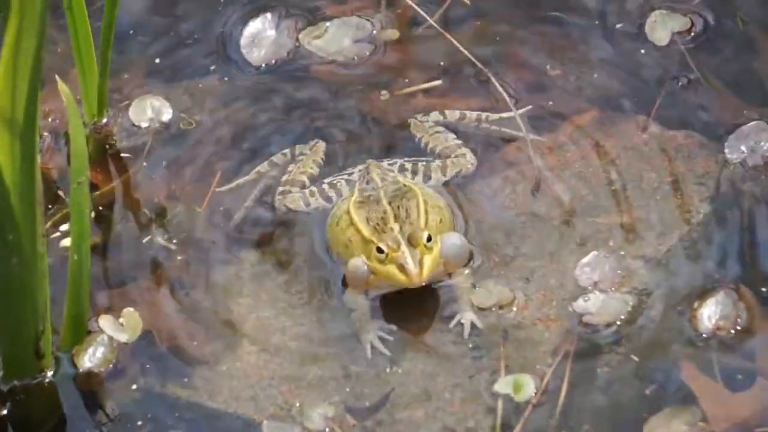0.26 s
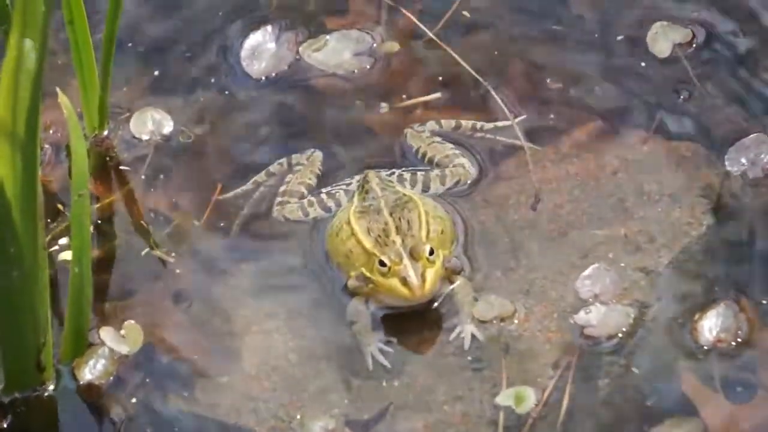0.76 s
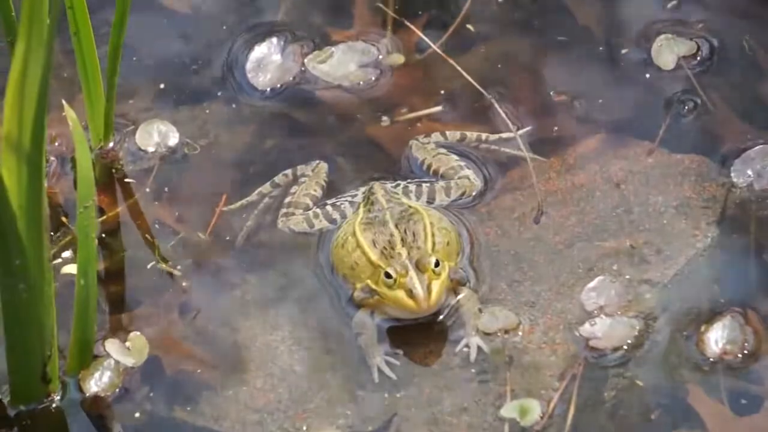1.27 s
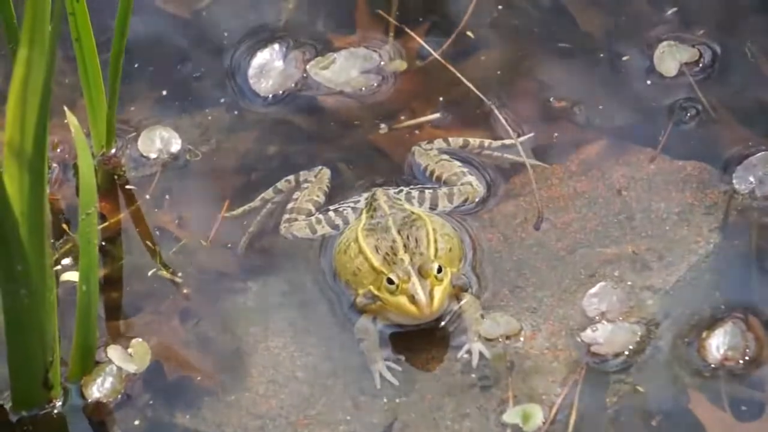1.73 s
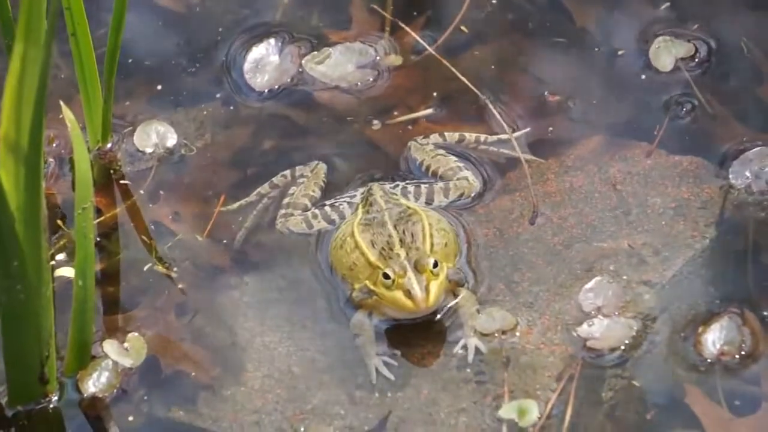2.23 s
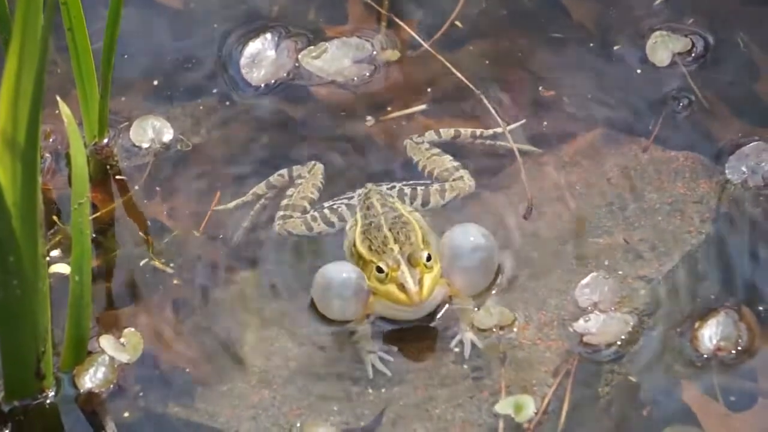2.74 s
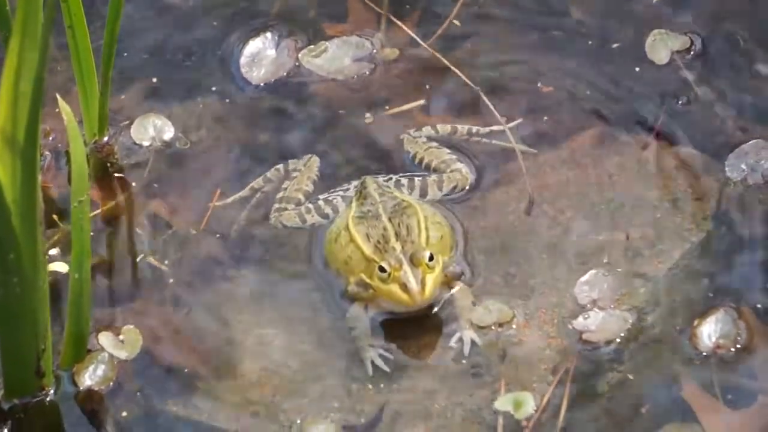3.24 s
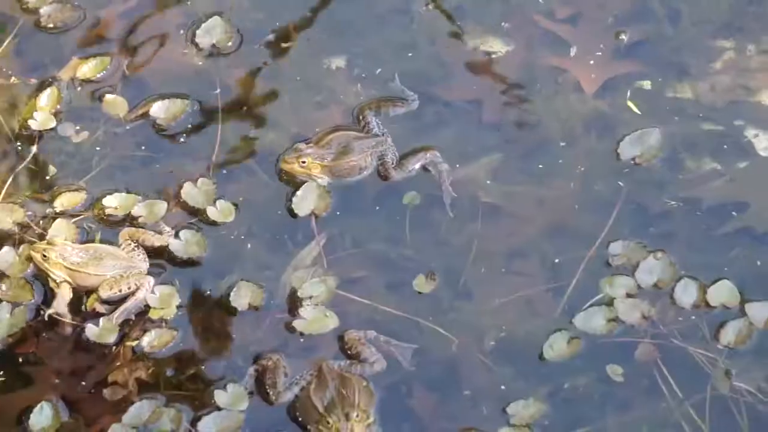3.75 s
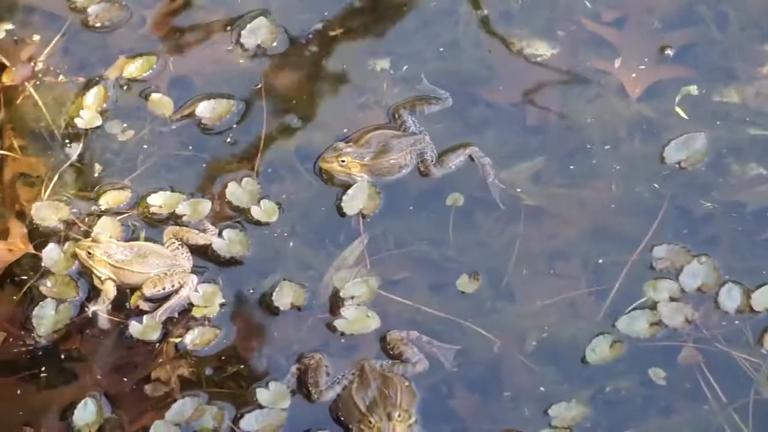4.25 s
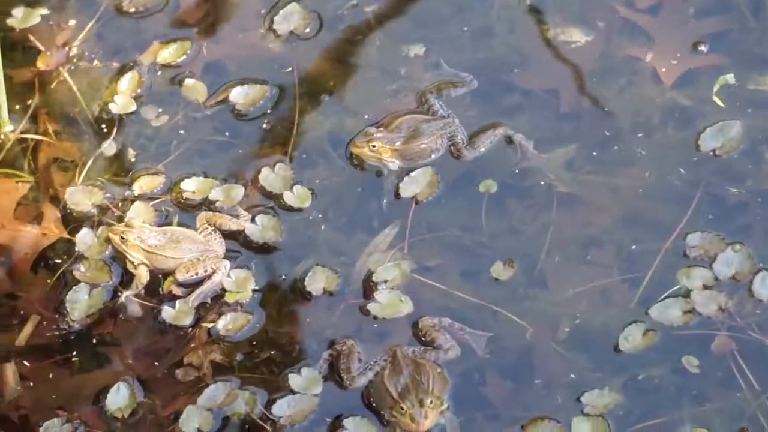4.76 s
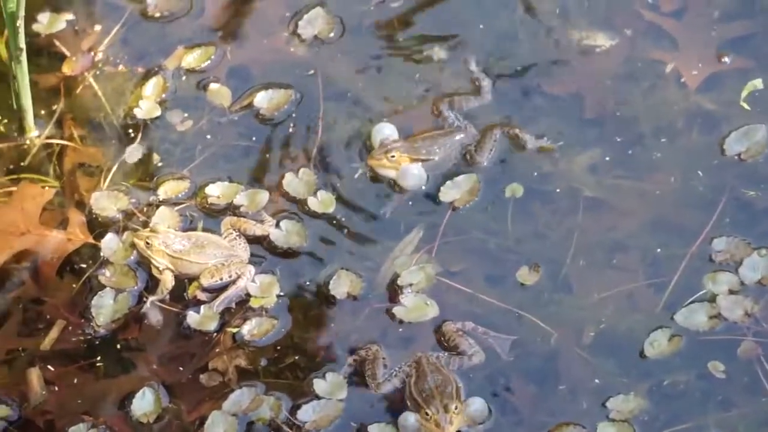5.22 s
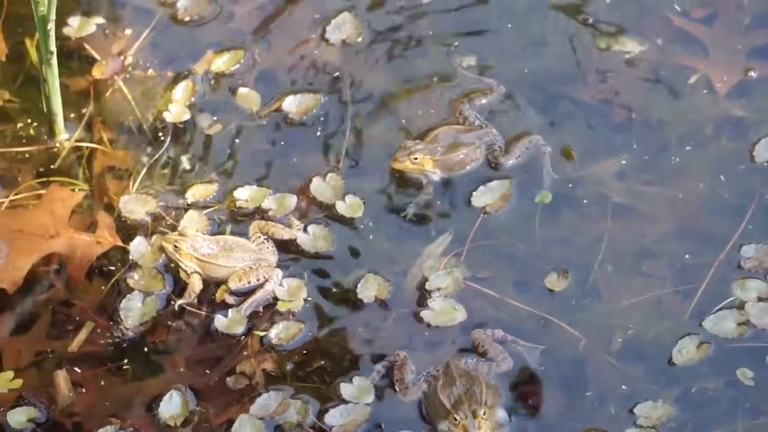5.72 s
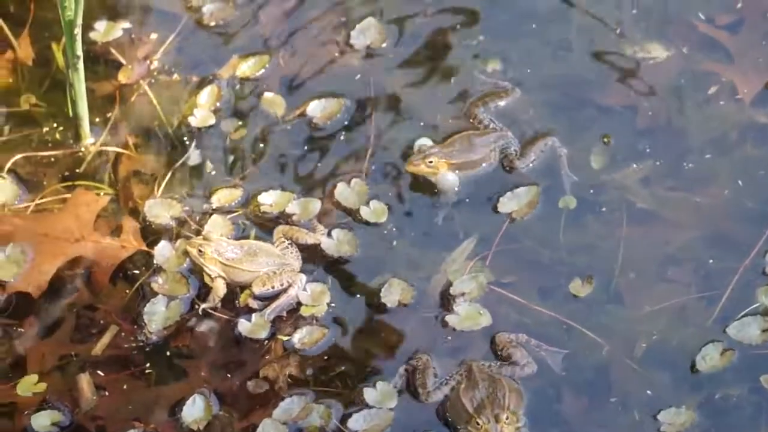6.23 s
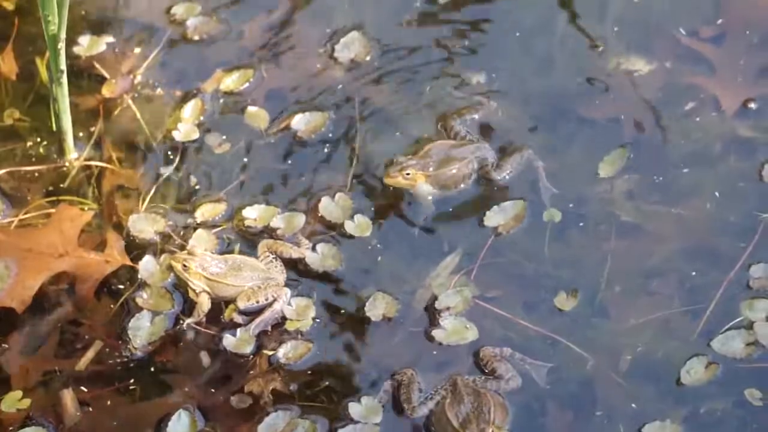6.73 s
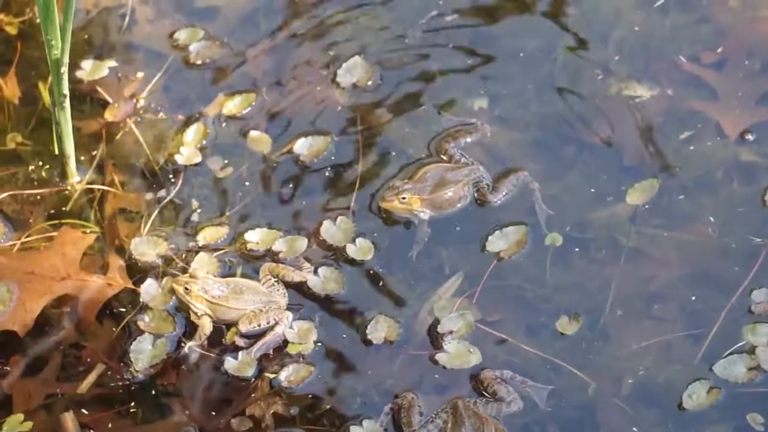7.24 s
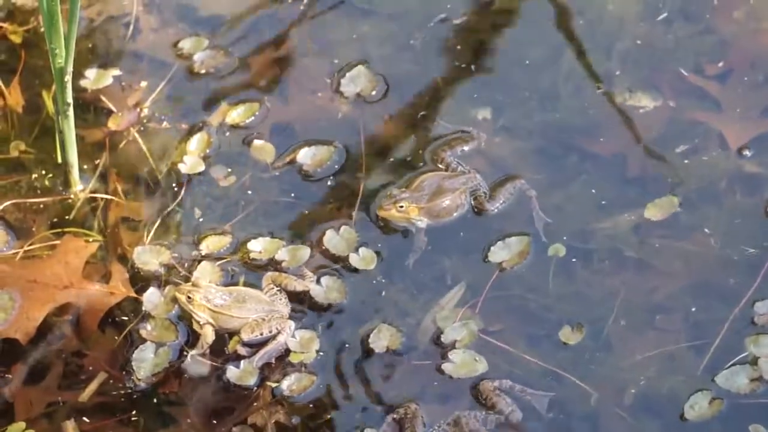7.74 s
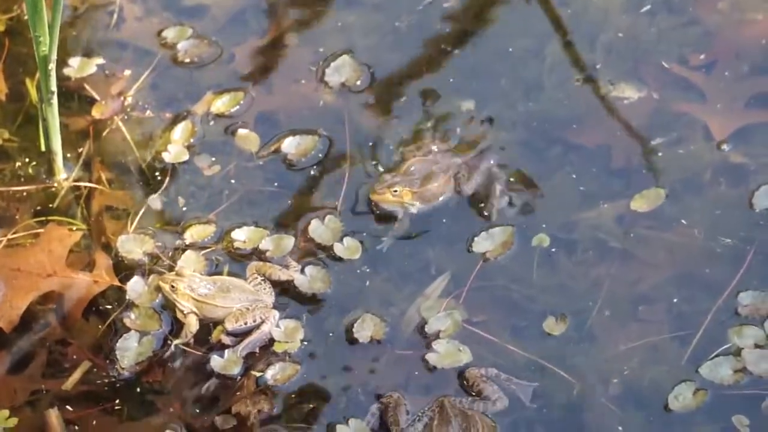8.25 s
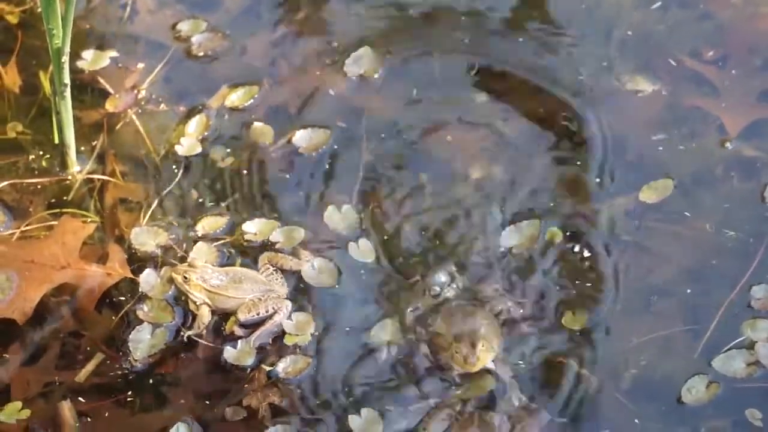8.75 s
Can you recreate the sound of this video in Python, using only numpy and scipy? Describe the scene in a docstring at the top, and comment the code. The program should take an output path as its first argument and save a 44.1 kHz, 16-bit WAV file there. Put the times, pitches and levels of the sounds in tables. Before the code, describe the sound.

A dense, rattling chorus of many frogs croaks almost nonstop at a pond, breaking off briefly once with a click before resuming.

```python
"""A pond bank: a frog chorus close to a small stereo microphone.
Each croak note is a slowing run of throat clicks that ring sac and body; near frogs stand out,
many farther ones fill the gaps. Rumble, light wind and thin hiss are shaped noise, a bird's whistles
gliding sines, a far engine five overtones. The sound breaks off once, with a click, and fades back in
from another spot on the bank; a faint tick follows. Click and tick are noise bursts."""
import sys
import numpy as np
from scipy import signal
from scipy.fft import rfft, irfft, next_fast_len
from scipy.io import wavfile
from scipy.ndimage import uniform_filter1d, minimum_filter1d, map_coordinates

SR = 44100
rng = np.random.default_rng(int(sys.argv[2]) if len(sys.argv) > 2 else 0)


def gain_from_decibels(decibels):
    """Convert decibel values to linear amplitude factors."""
    exponent = np.asarray(decibels, float) / 20
    return 10 ** exponent


def transcribe(signal):
    """Save signal, clipped to [-1, 1], as a 16-bit WAV file at the path in sys.argv[1]."""
    frames = np.atleast_2d(signal).T
    limited = np.clip(frames, -1, 1)
    pcm = np.round(limited * 32767).astype(np.int16)
    wavfile.write(sys.argv[1], SR, pcm)


N = 396018

# the drop and the fade back; row 1 starts the second spot: t/s, gain/dB
BREAK_GAIN = [(3.738, 0), (3.7392, -21), (3.748, -23), (3.753, -36), (3.765, -20), (3.79, -3), (3.85, 0)]


def unit(x):
    """x at rms 1."""
    return x / np.sqrt(np.mean(x ** 2) + 1e-20)


def along(points, hz):
    """(Hz, value) points interpolated on a log frequency axis."""
    f, v = np.transpose(points)
    return np.interp(np.log(hz + 1), np.log(f + 1), v)


def curves(rows):
    """One value per sample for each column after the time."""
    s, *cols = np.transpose(rows)
    return [np.interp(np.arange(N) / SR, s, c) for c in cols]


def wobble(rate_hz):
    """Smooth random curve, rate_hz knots a second."""
    knots = rng.standard_normal(int(N * rate_hz / SR) + 4)
    return map_coordinates(knots, [np.arange(N) * rate_hz / SR])


def noise(spectrum, alike):
    """Coloured stereo noise of rms 1; alike is the left-right correlation."""
    m = next_fast_len(N)
    gain = gain_from_decibels(along(spectrum, np.fft.rfftfreq(m, 1 / SR)))
    a, b = irfft(rfft(rng.standard_normal((2, m))) * gain, m)[:, :N]
    u = np.arccos(np.clip(alike, -1, 1)) / 2
    left = np.cos(u) * a + np.sin(u) * b
    right = np.cos(u) * a - np.sin(u) * b
    return unit(np.array([left, right]))


def rumble():
    """Distant rumble: low noise almost alike in both ports."""
    # rumble spectrum: f/Hz, relative density/dB
    rumble_shape = [(15, -50.5), (60, -22.5), (108, -8.5), (173, -3), (246, -1.5), (300, -0.5),
                    (390, -35.5), (660, -120)]
    return noise(rumble_shape, alike=.98)


def wind():
    """Light wind buffeting the ports: low noise with a lumpy level."""
    # buffeting spectrum: f/Hz, relative density/dB
    buffet_shape = [(12, -27), (22, -2), (70, 6), (130, -9.5), (300, -120)]
    against_rumble_db = -14.5
    return noise(buffet_shape, alike=.75) * gain_from_decibels(against_rumble_db + 4 * wobble(9))


def hiss():
    """Thin high noise whose level flickers."""
    # hiss spectrum: f/Hz, relative density/dB
    hiss_shape = [(4500, -30), (5600, 3), (7000, 0), (10500, -1), (12000, -6), (12800, -9), (14500, -9),
                  (15100, -14), (15700, -18), (16000, -60)]
    return noise(hiss_shape, alike=.5) * gain_from_decibels(1.5 * wobble(16))


def whine():
    """Faint narrow high noise band, present at the first spot only."""
    # whine spectrum: f/Hz, relative density/dB
    whine_shape = [(11800, -60), (12250, 0), (12500, 0), (12900, -60)]
    against_hiss_db = -14
    first_spot = np.arange(N) / SR < BREAK_GAIN[1][0]
    return gain_from_decibels(against_hiss_db) * noise(whine_shape, alike=.8) * first_spot


def drone():
    """Far engine: only its middle overtones, 5 to 9, rise over the rumble."""
    # engine: t/s, firing rate f/Hz, level of each overtone/dB
    engine = [(3.8, 24, -80), (5.2, 26.4, -66.5), (6, 27.6, -61), (6.6, 25.7, -65.5), (7.3, 27.5, -63),
              (8.2, 31.6, -63), (8.98, 33, -67)]
    rate_hz, db = curves(engine)
    turn = 2 * np.pi * np.cumsum(rate_hz) / SR
    return gain_from_decibels(db) * sum(np.sin(k * turn + 2 * np.pi * rng.random()) for k in range(5, 10))


def air():
    """Rumble and wind follow one level curve, hiss and whine another; the drone adds."""
    # background levels: t/s, rumble level/dB, hiss level/dB
    air_levels = [(0.0, -58.5, -72), (1.28, -58.5, -66), (1.67, -61.5, -75), (2.37, -57.5, -67),
                  (2.87, -63, -74), (3.5, -55.5, -63.5), (3.83, -63, -77), (4.32, -56, -71),
                  (5.63, -65, -81), (6.0, -60, -75), (6.85, -62, -76.5), (7.2, -55, -67),
                  (7.6, -66.5, -79.5), (8.98, -58, -71)]
    rumble_db, hiss_db = curves(air_levels)
    return gain_from_decibels(rumble_db) * (rumble() + wind()) + gain_from_decibels(hiss_db) * (hiss() + whine()) + drone()


def clicks():
    """The click of the cut, then a faint tick: bursts of differenced noise with an 8 ms t60."""
    # row 0 the click of the cut, row 1 the faint tick: t/s, level/dB
    bursts = [(3.737, -43.5), (4.7008, -48)]
    out, t = np.zeros((2, N)), np.arange(400) / SR
    pan = gain_from_decibels(np.array([[-2.5], [2.5]]))
    for s, db in bursts:
        burst = np.diff(rng.standard_normal(len(t) + 1))
        out[:, round(s * SR):][:, :len(t)] += gain_from_decibels(db - 60 * t / .008) * burst * pan
    return out


def bird():
    """Thin whistles with soft ends; pitch glides on a parabola through three values."""
    # whistles: start t/s, end t/s, first f/Hz, middle f/Hz, last f/Hz, level/dB
    whistles = [(5.57, 5.81, 2350, 1985, 1880, -34.5), (7.495, 7.585, 1960, 2070, 2230, -32.5),
                (8.345, 8.435, 1800, 1850, 1990, -31), (8.75, 8.805, 1850, 1870, 1930, -36)]
    t, out = np.arange(N) / SR, np.zeros(N)
    for start, end, first_hz, middle_hz, last_hz, db in whistles:
        u = np.clip((t - start) / (end - start), 0, 1)
        hz = first_hz * (1 - u) * (1 - 2 * u) + middle_hz * 4 * u * (1 - u) + last_hz * u * (2 * u - 1)
        swell = np.sin(np.pi * u) ** .43
        out += swell * gain_from_decibels(db) * np.sqrt(2) * np.sin(2 * np.pi * np.cumsum(hz) / SR)
    return out * gain_from_decibels(np.array([[.8], [-.8]]))


def bank(x):
    """Diffuse echo off water and plants: decaying noise, different in each port."""
    # echo decay: f/Hz, t60/s
    bank_t60 = [(300, 0.67), (1500, 1), (5000, 0.05)]
    hz, t, z = signal.stft(rng.standard_normal((2, SR // 4)), SR, nperseg=256)
    decay = gain_from_decibels(-60 * t / along(bank_t60, hz)[:, None])
    tail = signal.istft(z * decay, SR, nperseg=256)[1]
    return signal.fftconvolve(x, tail / np.linalg.norm(tail[0]), axes=1)[:, :N]


def croaks(notes, first_s, slowing, jitter, scatter_db, blur, upper_t60, count=12):
    """Stereo sum of notes: every click rings the sac, its lower partner, the upper ring and the body."""
    # rings of throat and body: f/Hz, level/dB, t60/s
    body_rings = [(393, -22, 0.02), (552, -19.5, 0.028), (700, -22.5, 0.054), (955, -15.5, 0.026),
                  (1879, -10, 0.0063), (2576, -28, 0.043), (3090, -25, 0.0069), (3600, -30, 0.0072),
                  (4900, -40.5, 0.019)]
    sac_level_db, upper_gain_db, phase_scatter_rad = -3.5, 5, .65
    s, db, sac_hz, top_hz, top_db, pan_db, length = np.transpose(notes)[:, :, None]
    draw = rng.standard_normal((len(notes), count, 39))

    # the clicks slow down
    gaps = first_s * np.exp(slowing * np.arange(count) + jitter * draw[..., 0])
    since = np.cumsum(gaps, axis=1) - gaps[:, :1]
    # firm start, level middle, fading end
    swell_db = 1.5 * np.exp(-since / .008) - 9 * (since / np.clip(length, .012, .08)) ** 2.3
    size_db = db + swell_db + scatter_db * draw[..., 1]

    modes = [(sac_hz, sac_level_db, .024, .008), (.86 * sac_hz, sac_level_db - 10, .013, .05)]
    # the upper ring builds up, then sinks and fades as the sac empties
    upper_hz = top_hz * (1.035 - 1.4 * since)
    upper_db = top_db + upper_gain_db - 3 * np.exp(-since / .004) - 90 * since
    modes.append((upper_hz, upper_db, upper_t60, blur))
    build = np.exp(.08 * draw[:, :1, 2])  # body size, drawn per note
    # a strong upper ring goes with a wider spectrum at both ends
    open_db = .26 * np.clip(top_db + 29, -10, 10)
    for hz, level_db, t60 in body_rings:
        tilt_db = -.0037 * hz * (since - .02)  # first clicks are the brightest
        spread_db = open_db * abs(np.log(hz / 1000))
        modes.append((hz * build, level_db + tilt_db + spread_db, t60, .04))

    t = np.arange(520, dtype=np.float32) / SR
    ring = 0
    for k, (hz, level_db, t60, spread) in enumerate(modes):
        hz = (hz * np.exp(spread * draw[..., 3 + k])).astype(np.float32)[..., None]
        size = gain_from_decibels(size_db + level_db + 1.1 * draw[..., 15 + k]).astype(np.float32)[..., None]
        phase = (np.pi * k + phase_scatter_rad * draw[..., 27 + k, None]).astype(np.float32)
        decay = gain_from_decibels(-60 * t / t60).astype(np.float32)
        ring = ring + size * np.sin(np.float32(2 * np.pi) * hz * t + phase) * decay
    ring *= (1 - np.exp(-t / .0003)) ** 2  # soft tissue takes a cycle to start

    out = []
    for side in (1, -1):
        # the nearer port hears it first
        start = np.round((s - .002 + since) * SR - side * .22 * pan_db).astype(int)
        index = np.clip(start[..., None] + np.arange(len(t)), -1, N) % (N + 1)
        heard = ring * gain_from_decibels(side * pan_db / 2)[..., None]
        out.append(np.bincount(index.ravel(), heard.ravel(), N + 1)[:N])
    return np.array(out)


def far_frogs(count=400):
    """Random crowd of notes spread around the pond, on a set level curve."""
    # farther frogs: t/s, level/dB, left-right/dB, sac f/Hz of those calling
    crowd_curve = [(0.0, -23, 3, 1520), (0.4, -24, 7.5, 1210), (0.92, -28.5, 1, 1432), (1.2, -24, 7, 1305),
                   (1.6, -20, 2, 1307), (1.75, -30, 4.5, 1398), (2.05, -23, 6.5, 1276),
                   (2.7, -25, 4.5, 1531), (2.95, -24.5, 9, 1420), (3.6, -23.5, 6, 1287),
                   (3.78, -19, -1.5, 1576), (4.08, -32, -6.5, 1386), (4.25, -20, -3.5, 1254),
                   (4.58, -20.5, -5.5, 1485), (5.63, -25, 2.5, 1412), (5.88, -25.5, -8.5, 1433),
                   (6.13, -28, -3, 1292), (6.48, -24, 2, 1393), (7.6, -21.5, -4.0, 1376),
                   (8.3, -25, -1, 1447), (8.6, -21.5, -3, 1169), (8.98, -27, -8, 1281)]
    level_db, pan_db, sac_hz = curves(crowd_curve)
    draw = rng.standard_normal((count, 5))
    s = (np.arange(count) + rng.random(count)) * N / SR / count
    pitch_hz = sac_hz[(s * SR).astype(int)] * np.exp(.12 * draw[:, 1])
    upper_hz = 4300 * np.exp(.061 * draw[:, 2])
    upper_db = -28 + .94 * draw[:, 3]
    notes = np.transpose([s - .03, .35 * draw[:, 0], pitch_hz, upper_hz, upper_db,
                          6 * draw[:, 4], np.full(count, .045)])
    crowd = croaks(notes, first_s=.0042, slowing=.065, jitter=.15, scatter_db=2, blur=.02, upper_t60=.009)
    return unit(crowd) * gain_from_decibels(level_db + np.array([pan_db, -pan_db]) / 2)


def in_step(near):
    """Gain for the crowd: it keeps time with the near frogs and hushes in their clear gaps."""
    share, smooth_s, noticed_db, range_db = .65, .011, 4.5, 12
    power = np.abs(uniform_filter1d((near ** 2).mean(axis=0), size=round(smooth_s * SR))) + 1e-9
    swing_db = 10 * np.log10(power / np.abs(uniform_filter1d(power, size=SR // 3)))
    return gain_from_decibels(share * np.clip(swing_db + noticed_db, -range_db, 0))


def near_frogs():
    """Single notes of the near frogs, each with its own sac, place, strength and length."""
    # notes: t/s, level/dB, sac f/Hz, upper ring f/Hz, upper ring re sac/dB (before croaks' offsets),
    # left-right/dB, length/s (held to 0.012-0.08)
    near_notes = [(0.0615, -9.5, 1720, 3930, -22, 2.5, 0.067), (0.1505, -8, 1712, 3780, -21.5, 2.5, 0.075),
                  (0.2179, -19, 1400, 3900, -30.5, 24.5, 0.056), (0.34, -14.5, 1310, 3660, -34, 15.5, 0.14),
                  (0.4239, -9.5, 1360, 4420, -29.5, 9.5, 0.062),
                  (0.4643, -12.5, 1430, 4100, -32, 2.5, 0.028),
                  (0.504, -12.5, 1375, 4160, -26.5, 10.5, 0.038), (0.5464, -10, 1196, 4800, -26, 8, 0.049),
                  (0.615, -22.5, 1385, 4120, -27.5, 13, 0.04), (0.6483, -8.5, 1165, 4440, -26, 9, 0.04),
                  (0.6699, -12, 1215, 4350, -40, 13.5, 0.032), (0.703, -29.5, 1060, 4150, -26, 14, 0.027),
                  (0.749, -9, 1223, 4160, -28.5, 8.5, 0.03), (0.7757, -10.5, 1260, 4160, -32, 14, 0.024),
                  (0.8687, -22, 1710, 4030, -28, 7.5, 0.076), (0.902, -21.5, 1325, 3900, -28, 19.5, 0.077),
                  (0.963, -14, 1386, 4320, -35, 10, 0.079), (0.9933, -12, 1290, 4020, -26, 10.5, 0.035),
                  (1.06, -12.5, 1337, 4000, -29.5, 7, 0.071), (1.1085, -17.5, 1210, 3980, -24, 3.5, 0.043),
                  (1.1433, -15, 1390, 3880, -27, 9, 0.041), (1.197, -25.5, 1430, 4100, -34, 19, 0.06),
                  (1.2247, -21, 1370, 3740, -22, 4.5, 0.097), (1.3783, -11, 1490, 4600, -41.5, 8, 0.033),
                  (1.4124, -14, 1060, 4480, -36, 4.5, 0.025), (1.4555, -12, 1340, 4430, -47, 14.5, 0.019),
                  (1.482, -15, 1000, 4070, -28.5, 9, 0.04), (1.533, -18, 1290, 4100, -44, 15, 0.023),
                  (1.5647, -14.5, 1540, 4420, -30, 14.5, 0.19), (1.6726, -9.5, 1270, 4140, -32, 5, 0.06),
                  (1.715, -17, 1310, 3980, -32, 7.5, 0.035), (1.779, -7.5, 1433, 4050, -34.5, 5.5, 0.032),
                  (1.8816, -21, 1190, 3800, -38, 19, 0.032), (1.9505, -18, 1275, 3600, -38, 14, 0.049),
                  (1.9849, -23.5, 1335, 4050, -34, 6, 0.021), (2.0218, -15.5, 1283, 4020, -36, 10, 0.05),
                  (2.0827, -15.5, 1330, 4020, -28.5, 14.5, 0.047),
                  (2.115, -20.5, 1316, 5070, -23, 11, 0.065), (2.165, -22, 1360, 4010, -26, 20.5, 0.04),
                  (2.2006, -21.5, 1500, 4050, -17, 9.5, 0.096),
                  (2.261, -12.5, 1310, 3950, -27.5, 14.5, 0.039), (2.299, -14.5, 1340, 4040, -24, 8, 0.061),
                  (2.419, -13, 1365, 4320, -33, 2, 0.055), (2.501, -5.5, 1618, 4160, -26, 5, 0.045),
                  (2.5715, -16.5, 1376, 4180, -23.5, 8, 0.092), (2.636, -14.5, 1810, 4070, -25, 6.5, 0.042),
                  (2.693, -7, 1600, 3920, -23.5, 2, 0.05), (2.766, -22, 1280, 4220, -21, 4.5, 0.025),
                  (2.7967, -10.5, 1773, 3650, -21, -2.5, 0.031), (2.8753, -38, 1420, 4000, -5, 3.5, 0.057),
                  (2.978, -31.5, 1420, 4200, -16, 9, 0.039), (3.016, -18, 1370, 4400, -26, 8, 0.035),
                  (3.0934, -15.5, 1390, 4340, -27.5, 5.5, 0.058), (3.1804, -9, 1430, 4100, -34, 15, 0.032),
                  (3.216, -18, 1285, 3600, -36, -5.5, 0.047), (3.261, -13.5, 1730, 4480, -31, 4.5, 0.051),
                  (3.343, -16, 1190, 3730, -37, 7, 0.058), (3.391, -12.5, 1820, 4360, -22, 8, 0.027),
                  (3.429, -13, 1260, 4400, -32, 5.5, 0.083), (3.506, -11, 1360, 4040, -28, 13.5, 0.03),
                  (3.54, -16, 1280, 3720, -40, 25.5, 0.081), (3.5845, -11, 1300, 3840, -32, 7.5, 0.054),
                  (3.6306, -11.5, 1254, 3910, -27, 6.5, 0.064), (3.66, -9, 1634, 4180, -27, 3, 0.017),
                  (3.729, -7.5, 1630, 4250, -21.5, 8, 0.031), (3.7808, -24, 1710, 4140, -12.5, -2.5, 0.021),
                  (3.8138, -21, 1570, 4500, -35, -15, 0.015), (3.851, -16, 1507, 4100, -16.5, -1, 0.044),
                  (3.923, -12, 1620, 3930, -22, -3.5, 0.049),
                  (3.9747, -10.5, 1584, 3720, -39.5, -2.5, 0.012),
                  (3.9935, -12, 1640, 3800, -21, -5, 0.034), (4.026, -15, 1070, 4200, -38.5, -9.5, 0.015),
                  (4.0127, -27.5, 1670, 3850, -33, 7, 0.006), (4.0567, -11, 1538, 4200, -33, -7, 0.057),
                  (4.147, -13.5, 1105, 4400, -51, -11, 0.019), (4.186, -14, 1250, 5000, -31, 1, 0.045),
                  (4.2966, -13.5, 1690, 4860, -26.5, 1, 0.074), (4.3485, -13.5, 1170, 4370, -24, 6, 0.02),
                  (4.396, -11, 1230, 3940, -29, -1, 0.058), (4.4714, -18.5, 1410, 3870, -22.5, 9, 0.056),
                  (4.541, -9, 1350, 4480, -32, -2.5, 0.037), (4.596, -13, 1350, 4220, -28, -4, 0.13),
                  (4.6354, -11, 1542, 4200, -27, -3, 0.069), (4.6897, -9, 1280, 4000, -24, -3, 0.035),
                  (4.712, -12, 1610, 4710, -23.5, -2, 0.036), (4.774, -11, 1420, 3930, -25.5, -0.5, 0.06),
                  (4.808, -13, 1360, 3730, -20, -2.5, 0.035), (4.851, -21, 1570, 4020, -17, 0.5, 0.049),
                  (4.8877, -8, 1546, 3670, -25, -10, 0.029), (4.9213, -6.5, 1623, 4330, -28, -3.5, 0.017),
                  (4.9621, -16, 1240, 3570, -26.5, 0, 0.027), (4.999, -39, 1300, 3360, -29.5, 5, 0.029),
                  (5.051, -11, 1274, 4380, -43, 1.5, 0.028), (5.1215, -12, 1454, 4200, -26.5, -3.5, 0.057),
                  (5.1811, -9.5, 1273, 4160, -27.5, -1, 0.031),
                  (5.2086, -11.5, 1645, 3900, -19.5, -9, 0.037),
                  (5.254, -12.5, 1550, 4100, -21.5, -0.5, 0.094),
                  (5.293, -13.5, 1596, 3640, -20, -9, 0.036), (5.321, -13, 1580, 4130, -22, -2.5, 0.046),
                  (5.3722, -8.5, 1335, 3760, -22.5, -4.5, 0.049),
                  (5.4188, -8.5, 1680, 4050, -31, -0.5, 0.022), (5.4744, -7, 1386, 4100, -27, -10, 0.049),
                  (5.5278, -23.5, 1240, 3720, -17.5, 2, 0.046), (5.575, -15, 1690, 4160, -24.5, -4.5, 0.03),
                  (5.6223, -8, 1615, 3660, -25, -7, 0.029), (5.709, -12.5, 1366, 3900, -25, -9.5, 0.062),
                  (5.7563, -11.5, 1210, 4500, -35, -3, 0.048),
                  (5.7885, -12.5, 1720, 3720, -21, -8.5, 0.045), (5.829, -10.5, 1170, 3900, -27, -3, 0.032),
                  (5.8735, -6, 1380, 3640, -23.5, -5, 0.04), (5.9425, -9.5, 1274, 3750, -25.5, -5, 0.066),
                  (5.9857, -17, 1130, 3450, -22, 3, 0.02), (6.045, -26, 1290, 3680, -31, -10, 0.037),
                  (6.083, -23, 1260, 4200, -34, 2, 0.038), (6.1574, -15.5, 1596, 4640, -40, -2, 0.034),
                  (6.21, -18.5, 1280, 4430, -33, -6.5, 0.042), (6.238, -19.5, 1445, 3550, -54, 9.5, 0.038),
                  (6.2781, -10, 1266, 4630, -32.5, 2.5, 0.06), (6.3375, -10, 1597, 4900, -25, -5.5, 0.029),
                  (6.3694, -9, 1290, 4750, -33, -0.5, 0.071), (6.4448, -9, 1284, 4700, -26.5, -6, 0.059),
                  (6.475, -7, 1270, 4500, -33, 2, 0.015), (6.5027, -13.5, 1230, 4700, -31, -10, 0.055),
                  (6.551, -8.5, 1340, 4460, -32.5, -1.5, 0.046),
                  (6.6063, -11.5, 1190, 4280, -30, -4, 0.026), (6.642, -17, 1200, 4230, -35, -1.5, 0.062),
                  (6.7052, -12, 1203, 4130, -29, 0.5, 0.07), (6.7442, -16.5, 1230, 4100, -30, -11, 0.011),
                  (6.7992, -8, 1220, 3890, -32, -3.5, 0.043), (6.842, -14.5, 1310, 4730, -29, -3, 0.016),
                  (6.8755, -12.5, 1620, 4880, -34, -2, 0.014), (6.9012, -14.5, 1474, 4500, -33, -10, 0.042),
                  (6.952, -8, 1340, 4460, -39, -2.5, 0.02), (6.9917, -11.5, 1543, 3670, -40, -6, 0.039),
                  (7.0494, -20, 1240, 4050, -33, 0, 0.059), (7.0866, -12.5, 1237, 4400, -36, -14.5, 0.029),
                  (7.119, -22, 1120, 4400, -23, 2, 0.061), (7.1784, -15, 1210, 4600, -33, -6.5, 0.059),
                  (7.2193, -13, 1265, 4370, -34, 4, 0.027), (7.2443, -16, 1174, 4070, -26.5, 6, 0.054),
                  (7.277, -6.5, 1236, 4020, -37, -2.0, 0.039), (7.3093, -7, 1210, 4460, -33, -2.5, 0.051),
                  (7.3653, -6.5, 1300, 3600, -38, -0.5, 0.15), (7.431, -12, 1450, 4200, -29.5, -11, 0.045),
                  (7.4619, -11.5, 1320, 4400, -28.5, -4.5, 0.067),
                  (7.513, -11, 1584, 4130, -23.5, -4.5, 0.069),
                  (7.558, -16.5, 1355, 4180, -23, -0.5, 0.063),
                  (7.6101, -19.5, 1480, 3930, -19, -0.5, 0.061), (7.686, -9, 1424, 3910, -25, 4, 0.052),
                  (7.735, -25, 1315, 3500, -24, -11.5, 0.015),
                  (7.778, -17.5, 1725, 3600, -18.5, -12.5, 0.026),
                  (7.8084, -10, 1290, 3760, -26, -0.5, 0.051), (7.887, -23, 1320, 4130, -27, 7.5, 0.15),
                  (7.944, -17, 1290, 4260, -31, -5.5, 0.04), (7.9974, -10.5, 1517, 4870, -38, -4, 0.037),
                  (8.0446, -16, 1640, 4600, -33, -5, 0.11), (8.102, -7, 1290, 4440, -32.5, 1.5, 0.034),
                  (8.1554, -14, 1200, 4200, -31, 1.5, 0.071), (8.242, -24, 1250, 4720, -40, -1, 0.025),
                  (8.2916, -24.5, 1250, 3320, -21, -1, 0.038), (8.3374, -15.5, 1230, 4200, -44, 1.5, 0.075),
                  (8.4314, -11.5, 1285, 4160, -32, 1.5, 0.058), (8.483, 0, 1235, 4680, -36, -3, 0.0084),
                  (8.521, -15, 1390, 4920, -29, 5, 0.027), (8.5526, -11.5, 1280, 4300, -34, -2, 0.044),
                  (8.5914, -10.5, 1220, 4270, -30, -5, 0.013), (8.6193, -8.5, 1290, 4300, -44, 2, 0.027),
                  (8.6757, -15.5, 1106, 4150, -35.5, -15, 0.024),
                  (8.7103, -13.5, 1230, 4030, -28.5, -6, 0.048), (8.776, -8, 1270, 4360, -44, 5.5, 0.015),
                  (8.8034, -14, 1180, 4200, -37, -4.5, 0.029), (8.8383, -12.5, 1270, 4100, -40, 2, 0.074),
                  (8.8857, -26.5, 1265, 3740, -35, -16, 0.017), (8.9095, -8, 1247, 4150, -28, 2, 0.027),
                  (8.9421, -10, 1367, 4140, -30.5, -3.5, 0.046), (-.02, -15, 1690, 4270, -14, 3, 0.11),
                  (.26, -21.5, 1270, 4740, -29.5, 17, 0.069), (.3, -18.5, 1330, 4600, -30, 13.5, 0.061),
                  (1.29, -19, 1465, 4130, -45, 8.5, 0.1), (2.597, -8.5, 1790, 4010, -21.5, 1.5, 0.037),
                  (3.14, -22, 1434, 4900, -17, 6.5, 0.069), (4.245, -25, 1420, 4550, -37, -5, 0.087),
                  (5.661, -17, 1370, 3800, -27, -4, 0.023)]
    return croaks(near_notes, first_s=.0042, slowing=.075, jitter=.06, scatter_db=1.7, blur=.009,
                  upper_t60=.02)


def sac_band(x, low_hz, high_hz):
    """The band that the sacs radiate."""
    sos = signal.butter(5, [low_hz, high_hz], "bandpass", fs=SR, output="sos")
    return signal.sosfilt(sos, x)


def port_width(x):
    """Close ports differ little in the bass: the side signal is shaped by frequency."""
    # stereo width: f/Hz, side gain/dB
    side_gain = [(150, -16), (400, -10), (800, -2), (1500, 2.5), (3000, 1)]
    left, right = x
    m = next_fast_len(N)
    gain = gain_from_decibels(along(side_gain, np.fft.rfftfreq(m, 1 / SR)))
    side = irfft(rfft((left - right) / 2, m) * gain, m)[:N]
    return (left + right) / 2 + np.array([side, -side])


def scene():
    """Frogs and bird with their echo, clicks and air."""
    near = near_frogs()
    frogs = near + in_step(near) * far_frogs()
    # the band reaches a little deeper at the second spot
    first_spot = np.arange(N) / SR < BREAK_GAIN[1][0]
    voiced = np.where(first_spot, sac_band(frogs, 372, 5200), sac_band(frogs, 325, 5010))
    whistle = bird()
    echo = gain_from_decibels(-17.5) * bank(voiced + .5 * whistle)
    return port_width(voiced + whistle + echo) + clicks() + air()


def limited(x, top):
    """Gain control that looks ahead and turns the loudest clicks down."""
    need = np.minimum(1, top / (np.abs(x).max(axis=0) + 1e-9))
    return x * uniform_filter1d(minimum_filter1d(need, size=401), size=201)


def band_limit(x):
    """A steep low-pass at the top of the band."""
    return signal.sosfilt(signal.butter(12, 15720, fs=SR, output="sos"), x)


def record(dry):
    """The sound is limited, drops abruptly once, then fades back."""
    level = limited(dry, top=.7)
    return band_limit(level * gain_from_decibels(curves(BREAK_GAIN)[0]))


dry = scene()
out = record(dry)
transcribe(out)
```